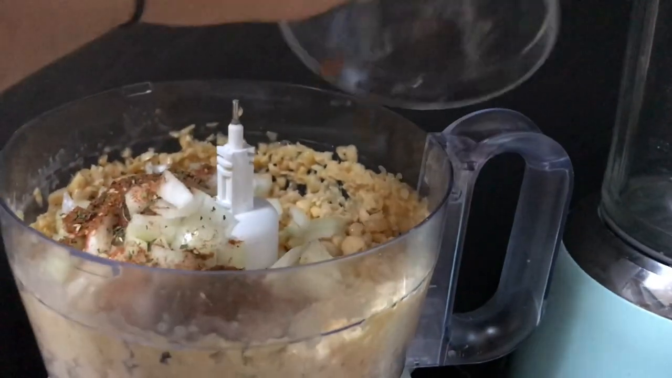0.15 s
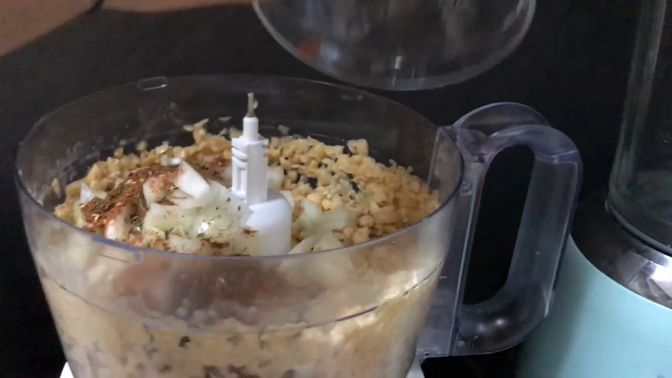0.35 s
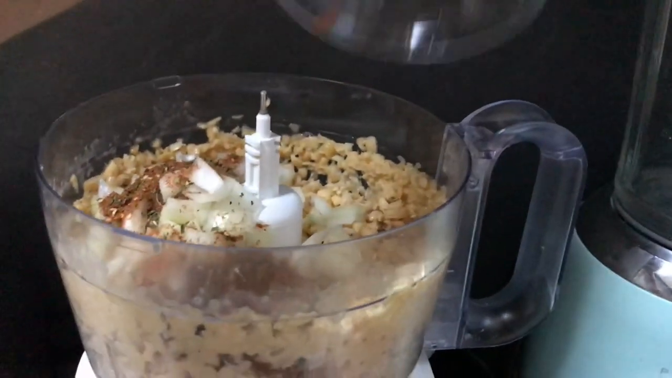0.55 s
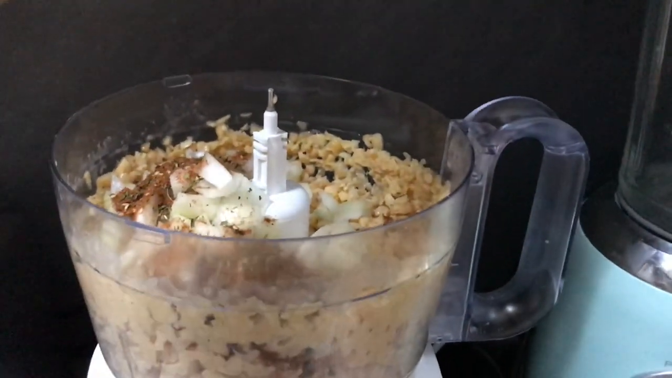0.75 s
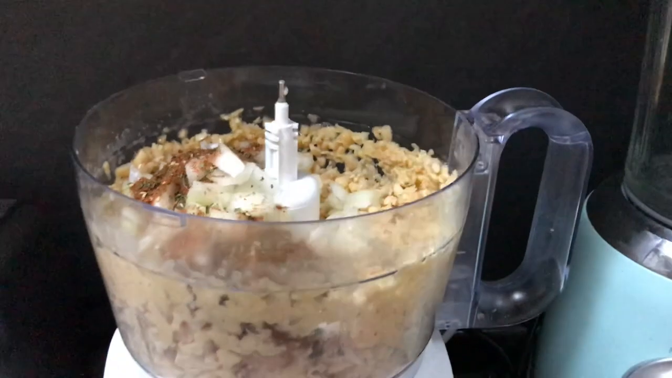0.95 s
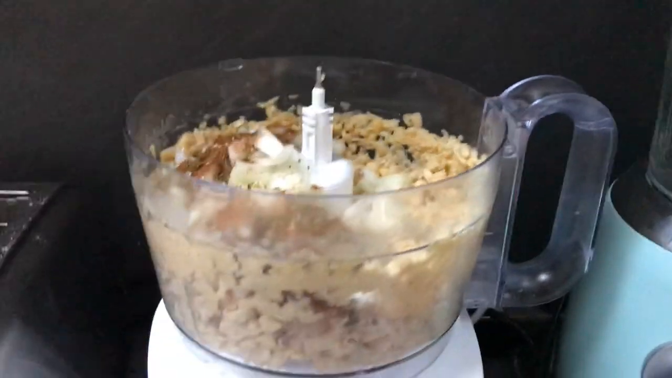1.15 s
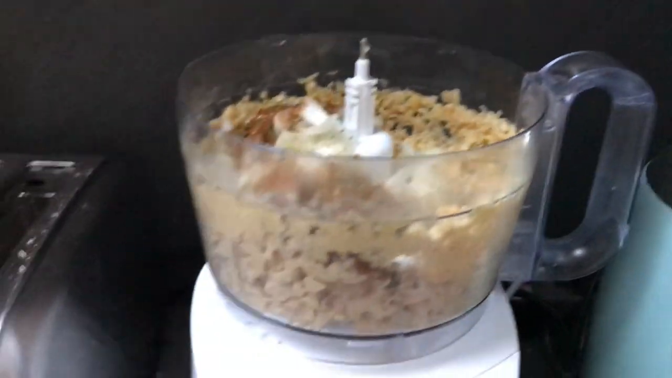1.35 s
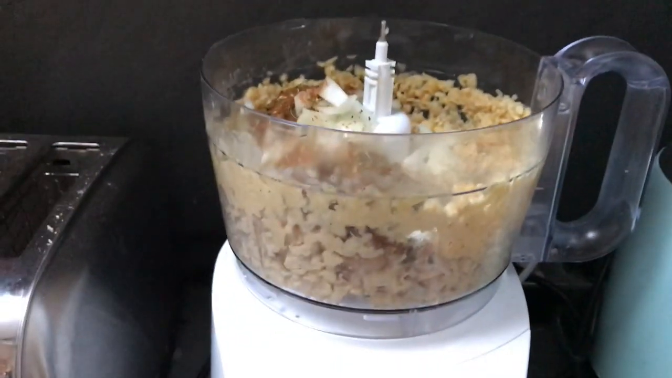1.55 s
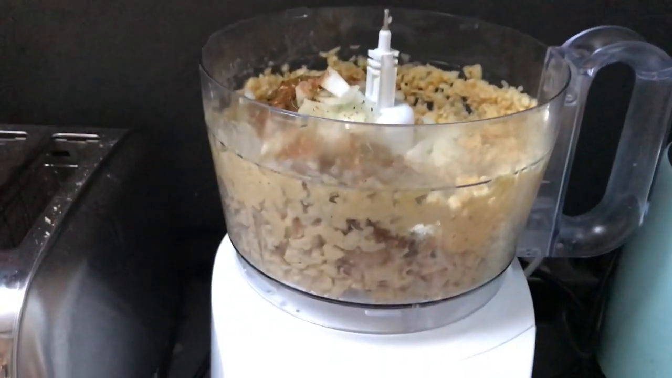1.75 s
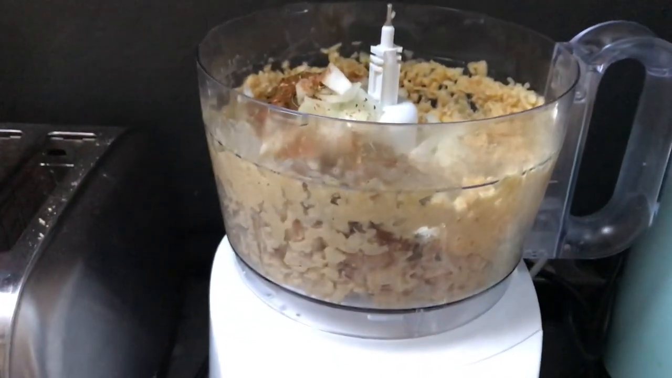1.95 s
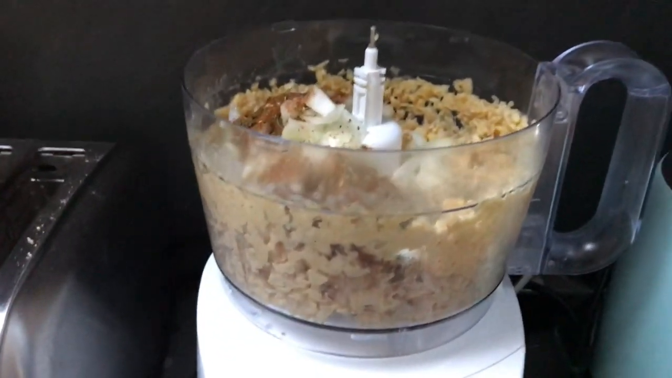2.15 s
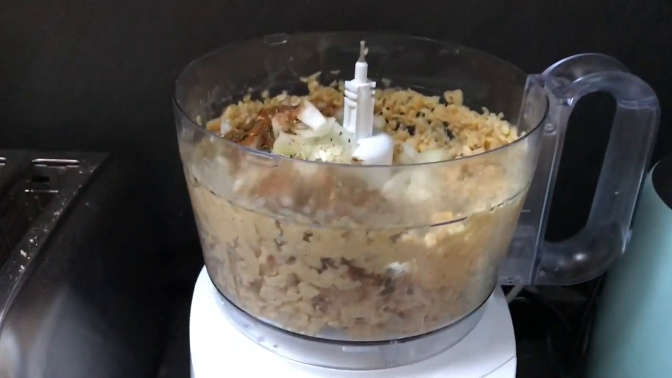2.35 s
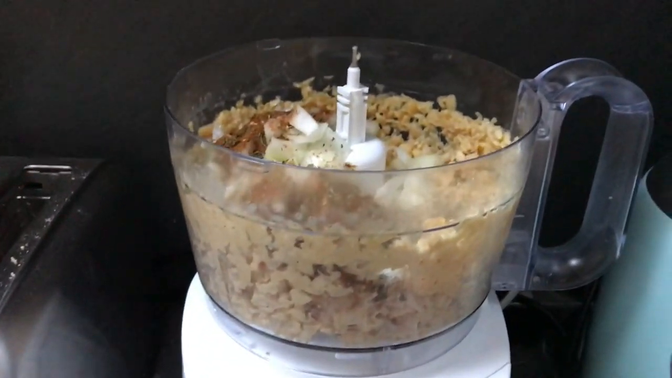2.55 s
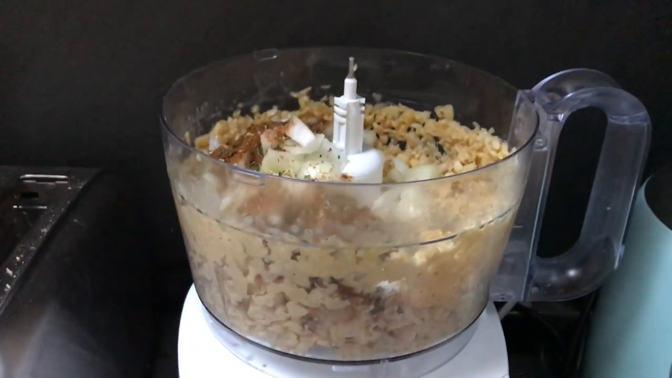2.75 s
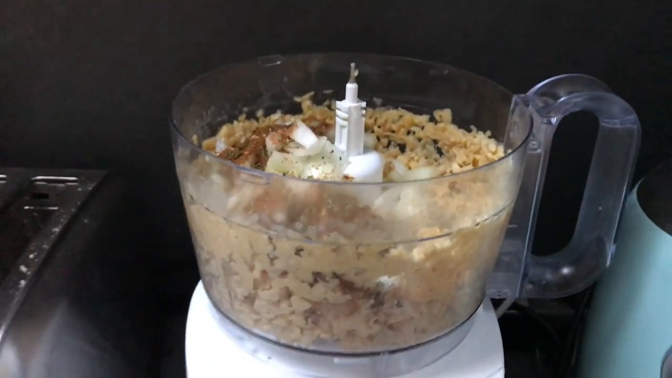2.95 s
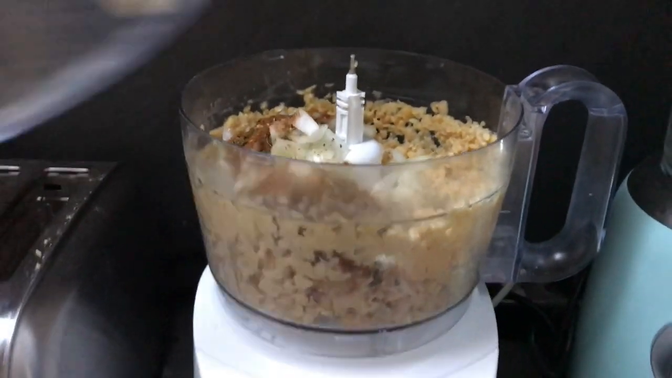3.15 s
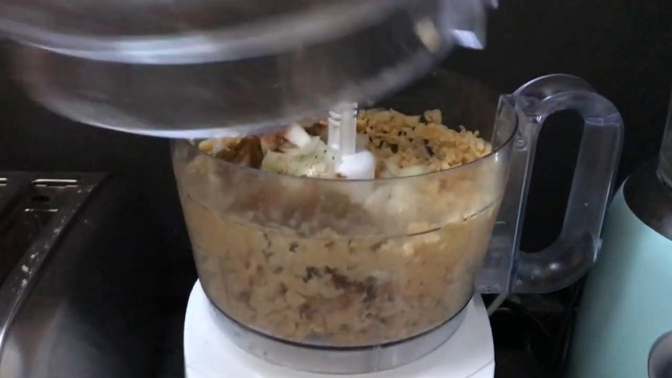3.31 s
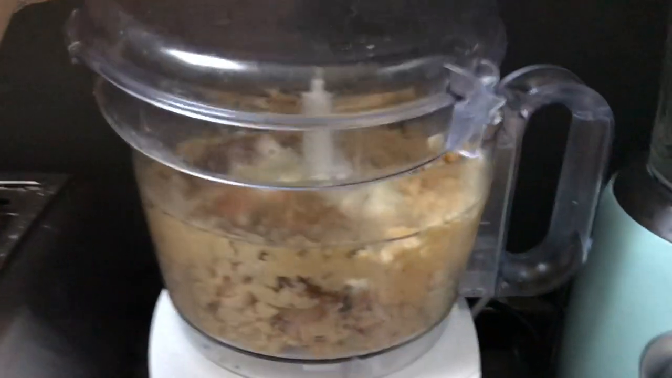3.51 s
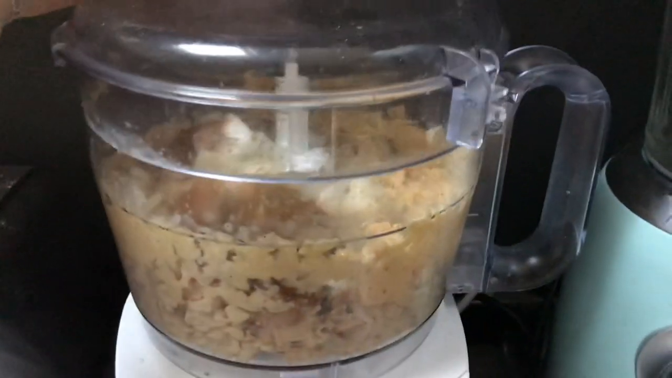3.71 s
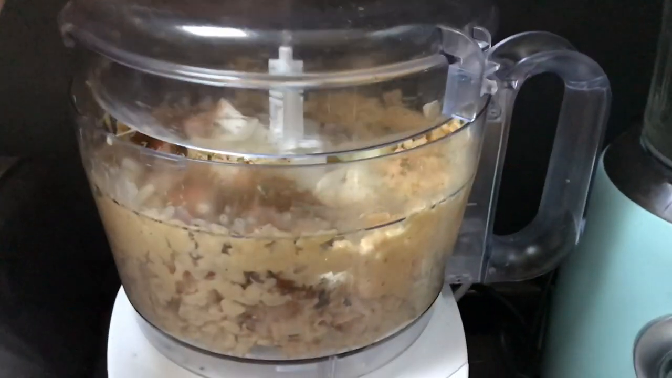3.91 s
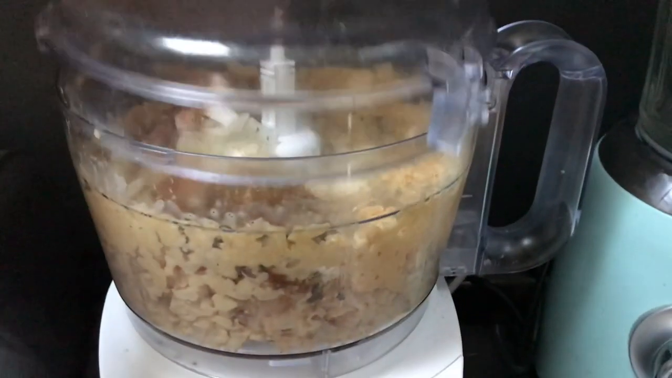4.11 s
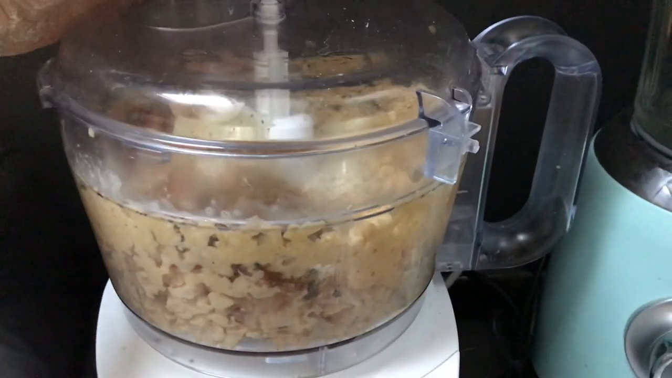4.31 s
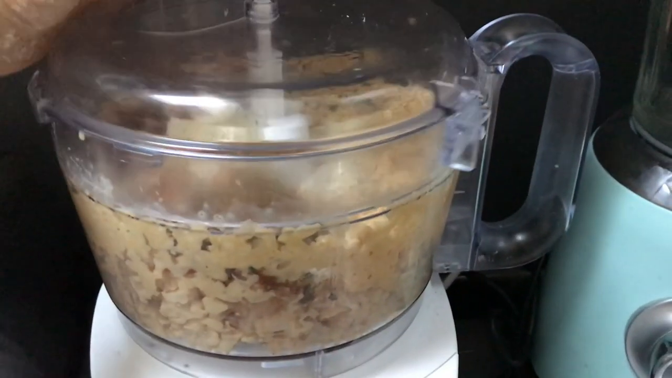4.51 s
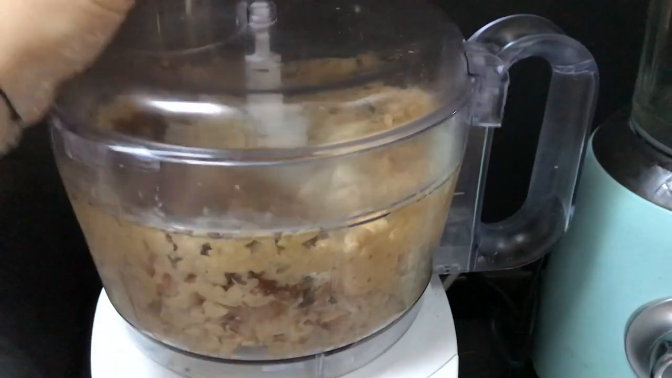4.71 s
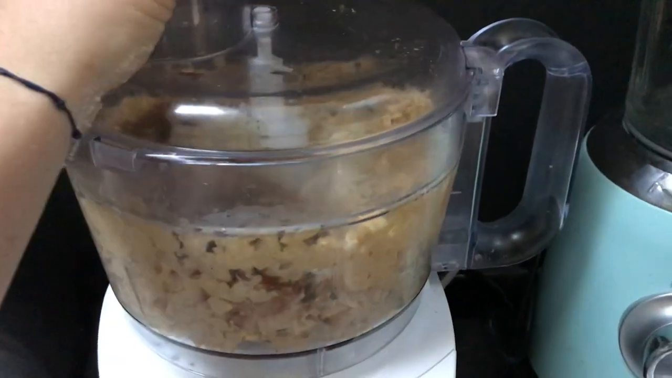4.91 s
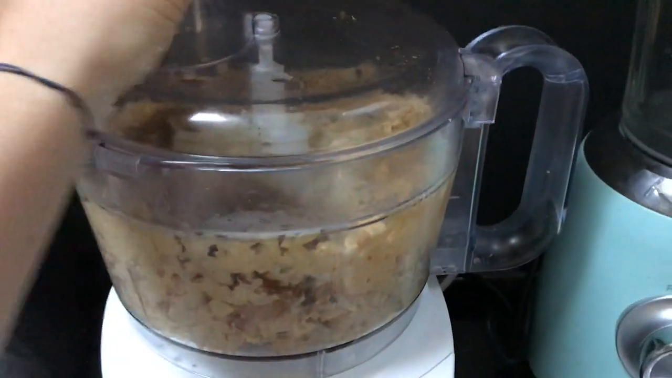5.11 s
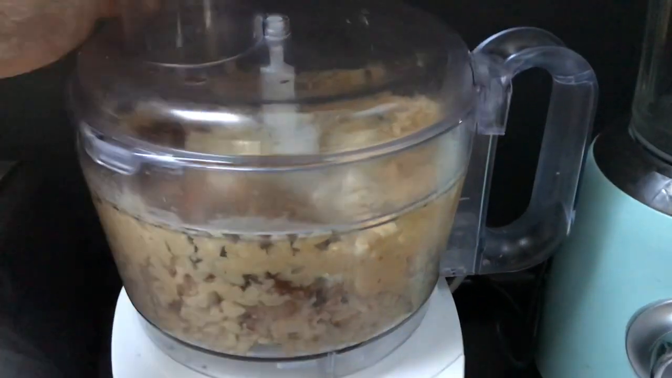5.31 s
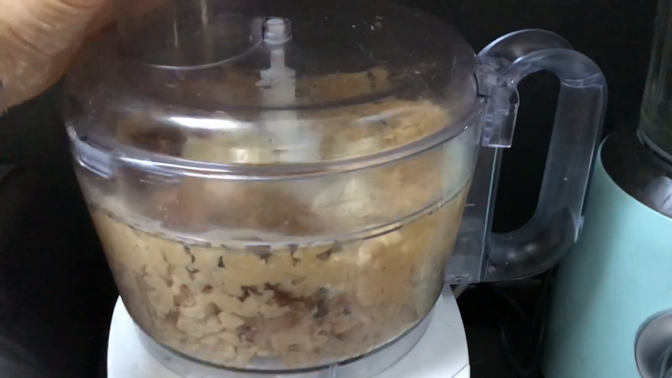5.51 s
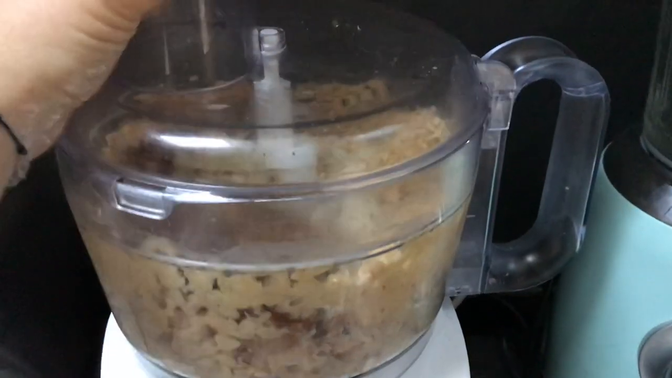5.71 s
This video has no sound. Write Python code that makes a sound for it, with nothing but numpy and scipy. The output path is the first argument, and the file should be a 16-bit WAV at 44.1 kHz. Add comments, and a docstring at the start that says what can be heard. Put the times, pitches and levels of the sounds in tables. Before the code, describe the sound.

In a quiet kitchen, glass knocks down with a faint lingering ring, followed by hard plastic clattering, short rubbing, a tiny squeak and locking clicks.

```python
"""A fridge whines faintly in the airy background of a small kitchen, as steady tones over soft noise.
A little glass bowl is set down on the worktop: it knocks and rocks to rest, and its rim note hums on.
A low hum, a tone with its octave, then sets in and rises and falls.
A plastic food processor lid clatters onto the work bowl, is slid round with a squeak and snaps into its lock.
Knocks are dying noise plus ringing tones, rubbing is shaped noise, and the squeak is a falling tone."""
import sys
import numpy as np
from scipy import signal
from scipy.io import wavfile

SR = 44100
rng = np.random.default_rng(int(sys.argv[2]) if len(sys.argv) > 2 else 0)


def dump(signal):
    """Clip the signal to [-1, 1] and save it as 16-bit WAV at the path in sys.argv[1]."""
    limited = np.clip(np.atleast_2d(signal).T, -1, 1)
    pcm = np.round(limited * 32767).astype(np.int16)
    wavfile.write(sys.argv[1], SR, pcm)


N = 258514
TIME = np.arange(N) / SR
RING_TIME = TIME[:SR // 2]

# Pitch ranges in which the strength of a blow is set, from thump and knock up to clack and tick:
# (low edge [Hz], high edge [Hz], length of the attack [s])
ZONES = [(55, 400, .03), (400, 2100, .012), (2100, 6000, .012), (6000, 16000, .012)]


def glass_bowl():
    """The foot of the bowl knocks on the worktop and chatters to rest, while the rim note rings on."""
    # blows of the glass: (time [s], knock [dB], thump above the knock [dB],
    # treble slope [dB per octave], each bounce above the contact before it [dB])
    glass_hits = [(.808, -79, 10, -1, -1.5), (1.68, -18, -10.5, -7, -25.5), (1.763, -21, -11.5, -6.5, -23),
                  (1.791, -24.5, -10, -7, -14.5), (1.806, -28, -7.5, -6.5, -2.5),
                  (1.922, -17, -13, -5.5, -8), (1.968, -26, -3, -3, -19), (1.98, -26, -8, -18, -3),
                  (2.255, -62, 6, -8, -12), (2.5, -43.5, 7.5, -8.5, -10.5)]
    # crowded, quickly dying vibrations of the worktop: (pitch [Hz], level [dB per Hz], time to fall 60 dB [s])
    worktop = [(70, 0.5, 0.08), (164, -2.5, 0.15), (261, -7, 0.16), (400, 7.5, 0.019), (625, 8, 0.042),
               (810, -0.5, 0.047), (1190, 10, 0.032), (1780, -1.5, 0.016), (2270, -27.5, 0.026),
               (3404, 5, .035), (4110, -19, 0.046), (6400, -28, 0.007), (15000, -31, 0.0075)]
    # separate ringing tones: (pitch [Hz], level [dB], time to fall 60 dB [s])
    glass_modes = [(72, -5, .25), (124, -13, .35), (180, -8, .22), (385, -14, .15), (692, -5, .12),
                   (1025, -12, .14), (1120, -3, .13), (1160, 5, .02), (1930, -18, .1), (3300, -8, .035),
                   (3680, -8, .035), (8800, -9, .014), (9450, -30, .13), (9490, -28, .15),
                   (12980, -25, .11), (13020, -31, .11), (15350, -28, .1)]
    touches = contacts(glass_hits, gap_s=.0095, presence_db=-3, dulling_db=1.4, count=4)
    knocks = blows(touches, worktop, glass_modes, rise_s=0.0001, crack_db=6.5, crack_s=0.01)
    return knocks + rim_note()


def rim_note():
    """The bowl is not quite round, so two close rim tones beat slowly as they die away."""
    struck_s, level_db, t60_s = 1.922, -42, 2.27
    rim_hz, beat_hz, twin_db = 1196, 2.15, -7.5
    age = np.maximum(TIME - struck_s, 0)
    main_tone = np.sin(2 * np.pi * rim_hz * age)
    twin_tone = from_db(twin_db) * np.sin(2 * np.pi * (rim_hz + beat_hz) * age)
    fade = np.exp(-np.log(1000) * age / t60_s)
    return from_db(level_db) * fade * (main_tone + twin_tone)


def lid_knocks():
    """The lid clatters and rebounds once per blow; once it is seated, the hand shifts its tones each time."""
    # blows of the lid: (time [s], knock [dB], thump above the knock [dB],
    # treble slope [dB per octave], the bounce above the contact before it [dB])
    lid_hits = [(3.631, -20, -15.5, -5.5, -21), (3.691, -25.5, -15, -3.5, -12),
                (3.708, -28.5, -13, -11, -8), (3.798, -16, -19.5, -9, -7.5), (3.857, -35, -12, -5, -28),
                (3.867, -30.5, -8.5, -8.5, 1), (3.935, -50.5, 7.5, -1.5, -2.5),
                (4.062, -44.5, 0, -5.5, -23), (4.14, -63.5, 0, -1.5, 9), (4.169, -28.5, -7.5, -6.5, -6),
                (4.183, -40, 1.5, -3, -16), (4.216, -50, 3.5, 1, -4), (4.2499, -13.5, -10.5, -6.5, -7),
                (4.268, -33.5, 0, -3.5, -9), (4.281, -29, -0.5, -2, -14), (4.3291, -23.5, -7, -6.5, -8.5),
                (4.803, -28.5, -14, -1.1, 2.5), (4.871, -37, 2, -8, -13.5), (5.185, -45.5, 1, -4.5, -23.5),
                (5.244, -42.5, 2, -6.5, -1), (5.388, -36, -5.5, 0, -19), (5.397, -21, -7, -5.5, -0.5),
                (5.507, -34, -7.5, -10.5, -20), (5.547, -40, 1.5, -8, -10), (5.658, -31, -9, -1.5, 4.5),
                (5.711, -32, -0.5, -3.5, -6), (5.736, -28.5, 3, -1.5, -8), (5.7425, -19.5, -12.5, -2.5, 4),
                (5.769, -35.5, -21, -2, -7)]
    # crowded, quickly dying vibrations of the plastic: (pitch [Hz], level [dB per Hz], time to fall 60 dB [s])
    plastic = [(70, -11.5, .2), (153.3, -12.5, 0.098), (271, -0.5, 0.082), (432, -9, 0.028),
               (593, -3.5, 0.06), (805, 3.5, 0.032), (1240, -5, 0.044), (1460, -13, 0.038),
               (2060, -13.5, 0.036), (3070, -6.5, 0.042), (6500, -22, 0.034), (15700, -29, 0.01475)]
    # ringing tones; the seated lid is damped by the rim and drives the low tones of the work bowl:
    # (pitch [Hz], level when loose [dB], level when seated [dB], time to fall 60 dB [s])
    lid_modes = [(118.7, -9, -6.5, 0.25), (169, -18, -1, 0.14), (214.7, -37, 3.5, 0.093),
                 (281.9, -9.5, -0.5, 0.11), (565, -15, -20, .2), (770, -10, -15, .05), (862, -4, -11, .09),
                 (876, -2, -8, .13), (1020, -15, -7, .07), (1140, -8, -13, .15), (1465, -11, -4, .05),
                 (1530, 2, 2, .06), (1645, -3, -3, .07), (2114, -21.5, -11, 0.063),
                 (2460, -14, -8.5, 0.061), (2646, -18.5, -4, .04), (2870, -18, -13, 0.07),
                 (3360, -6.5, -20, 0.056), (4095, -25.5, -3, 0.019)]
    seated_from_s = 4.24
    grip_detune = 0.0266  # typical shift as a share of the pitch
    touches = contacts(lid_hits, gap_s=.0052, presence_db=2.0, dulling_db=0.3, count=1)
    seated = touches[:, :1] > seated_from_s
    modes = []
    for hz, loose_db, seated_db, t60 in lid_modes:
        shifted_hz = hz * (1 + seated * grip_detune * rng.standard_normal(seated.shape))
        modes.append((shifted_hz, np.where(seated, seated_db, loose_db), t60))
    return blows(touches, plastic, modes, rise_s=0.00052, crack_db=0.5, crack_s=0.0096)


def contacts(hits, gap_s, presence_db, dulling_db, count):
    """List each blow and its bounces, each bounce duller per octave: (time [s], level in each zone [dB])."""
    centres = np.sqrt([low * high for low, high, _ in ZONES])
    # how far the two upper zones lie above the knock zone
    clack_octaves, tick_octaves = np.log2(centres[2:] / centres[1])
    rows = []
    for s, knock_db, thump_db, slope_db, bounce_db in hits:
        for k in range(count + 1):
            db = knock_db + k * bounce_db
            slope = slope_db - k * dulling_db
            clack_db = db + presence_db + slope * clack_octaves
            tick_db = db + slope * tick_octaves
            rows.append((s + k * gap_s, db + thump_db, db, clack_db, tick_db))
    return np.array(rows)


def blows(hits, body, modes, rise_s, crack_db, crack_s, scatter_db=2.0):
    """Every contact rings the same body; where and how hard it lands sets the share of each zone."""
    rings = unit_attack(dense_ring(body, len(hits)), .012)
    for hz, level_db, t60 in modes:
        # the point of contact decides how strongly, and which way, a tone is pushed
        scattered_db = level_db + scatter_db * rng.standard_normal((len(hits), 1))
        direction = np.sign(rng.standard_normal((len(hits), 1)))
        tone = dying(t60) * np.sin(2 * np.pi * hz * RING_TIME)
        rings = rings + from_db(scattered_db) * direction * tone
    # the contact takes a moment to build up, and opens with a short crack
    rings = rings * (1 - np.exp(-RING_TIME / rise_s))
    rings = rings * from_db(crack_db * np.exp(-RING_TIME / crack_s))
    voiced = 0
    for k, (low, high, span_s) in enumerate(ZONES):
        zone_sound = unit_attack(band(rings, low, high, order=3), span_s)
        voiced = voiced + zone_sound * from_db(hits[:, [k + 1]])
    out = np.zeros(N + len(RING_TIME))
    for s, sound in zip(hits[:, 0], voiced):
        start = round(s * SR)
        out[start:start + len(sound)] += sound
    return out[:N]


def lid_slide():
    """Glass and plastic rub and slide under the fingers: noise made grainy by tiny catches of the rim."""
    # rubs: (time [s], length [s], grind at the end of the stroke [dB], hiss at the end of the stroke [dB])
    strokes = [(0.916, 0.042, -84, -73), (1.143, .12, -71, -71.5), (2.003, 0.29, -70, -66),
               (2.462, 0.061, -45, -57), (2.579, .025, -68, -62.5), (2.657, 0.044, -56.5, -58),
               (2.857, 0.07, -68, -67.5), (3.637, 0.15, -45, -62), (3.814, 0.043, -32, -44.5),
               (3.92, 0.018, -45, -61.5), (3.986, .05, -46, -59.5), (4.182, .13, -38.5, -50),
               (4.407, 0.19, -58.5, -61.5), (4.606, 0.24, -48.5, -55), (4.816, 0.04, -48.5, -54.5),
               (4.925, 0.253, -65.5, -68), (5.197, 0.059, -48.5, -55), (5.369, 0.033, -44, -49),
               (5.445, 0.044, -48.5, -59), (5.565, 0.095, -55.5, -60), (5.644, 0.082, -41, -44.5),
               (5.719, 0.024, -34, -42), (5.788, 0.033, -45.5, -68)]
    # colour of the low grinding noise: (pitch [Hz], level [dB per Hz])
    grind_colour = [(60, -34), (110, -6.5), (160, 1), (280, -6), (460, -10), (870, -7), (1250, -14),
                    (1520, -12.5), (2300, -23), (3200, -24), (6000, -62)]
    # colour of the high hissing noise: (pitch [Hz], level [dB per Hz])
    hiss_colour = [(1200, -37), (2200, 0.5), (3200, 1.5), (4700, 1.5), (7000, -3.5), (10000, -4),
                   (14500, -11.5), (16500, -4.5)]
    rough_db, catches_per_s = 2.0, 330
    grind, hiss = 0, 0
    for s, length_s, grind_db, hiss_db in strokes:
        shape = stroke(s, length_s)
        grind = grind + from_db(grind_db) * shape
        hiss = hiss + from_db(hiss_db) * shape
    catches = rms_one(from_db(rough_db * drift(catches_per_s)))
    return catches * (grind * coloured(grind_colour) + hiss * coloured(hiss_colour))


def stroke(start, length_s):
    """Loudness of a rub: it takes hold, swells as the hand presses on, and dies when the hand stops."""
    attack_s, rise_db, release_db_per_s = 0.017, 9, 252
    age = TIME - start
    swell_db = rise_db * (np.clip(age / length_s, 0, 1) - 1)
    release_db = release_db_per_s * np.maximum(age - length_s, 0)
    return np.clip(age / attack_s, 0, 1) * from_db(swell_db - release_db)


def lid_squeak():
    """The rim sticks and slips, giving brief falling tones with their octave."""
    # squeaks: (time [s], settled pitch [Hz], level [dB])
    squeaks = [(5.286, 5725, -26.5), (5.37, 5650, -41)]
    attack_s, t60_s, octave_db = 0.0043, 0.034, -9
    sharp_hz, settle_s = 600, 0.0035  # each starts this much higher and falls
    out = 0
    for s, hz, db in squeaks:
        age = np.maximum(TIME - s, 0)
        pitch = hz + sharp_hz * np.exp(-age / settle_s)
        phase = 2 * np.pi * np.cumsum(pitch) / SR
        fade = np.interp(age - attack_s, RING_TIME, dying(t60_s))
        envelope = np.minimum(age / attack_s, 1) ** 2 * fade
        tone = np.sin(phase) + from_db(octave_db) * np.sin(2 * phase)
        out = out + from_db(db) * envelope * tone
    return out


def background():
    """Add up the room air, the fridge and the low hum."""
    return room_air() + fridge_whine() + low_hum()


def fridge_whine():
    """The fridge gives faint tones of steady level whose phase wanders a little."""
    # tones: (pitch [Hz], rms level [dB], speed of the wandering [random steps per s])
    fridge_tones = [(98, -69, 2.7), (159, -72, 54), (685, -80, 15), (1427, -79.5, 15), (1530, -79, 10),
                    (1570, -81, 5.2), (1650, -75, 0.98), (1736, -81, 4.6)]
    stray = 0.41  # typical phase wander, radians
    out = 0
    for hz, db, steps_per_s in fridge_tones:
        tone = np.sin(2 * np.pi * hz * TIME + stray * drift(steps_per_s))
        out = out + from_db(db) * np.sqrt(2) * tone
    return out


def low_hum():
    """A low tone with its octave sets in, wavers in pitch, and rises and falls in level."""
    # loudness of the hum: (time [s], level [dB])
    hum_level = [(2.35, -72), (2.6, -53), (2.95, -51.5), (3.25, -60.5), (3.7, -46.5), (5.5, -47),
                 (5.86, -54)]
    hum_hz, waver_hz, octave_db = 79.5, 0.36, -14
    phase = 2 * np.pi * np.cumsum(hum_hz + waver_hz * drift(1.8)) / SR
    swell = (TIME > hum_level[0][0]) * from_db(in_time(hum_level)[0])
    return swell * (np.sin(phase) + from_db(octave_db) * np.sin(2 * phase))


def room_air():
    """The air of the room is steady, mostly low noise."""
    # colour of the air noise: (pitch [Hz], level [dB per Hz])
    air_colour = [(25, -28), (50, -1.5), (90, 4), (150, -4.5), (220, -11), (500, -13), (1000, -16.5),
                  (1550, -19), (2100, -23), (4000, -28), (9000, -33), (16000, -35.5)]
    return from_db(-64.5) * coloured(air_colour)


def kitchen(x, wet_db):
    """Add echoes off nearby surfaces, which colour the treble, and the blurred tail of a small hard room."""
    # echoes off worktop, wall and neighbouring appliances: (delay [s], level [dB])
    reflections = [(.0011, -17), (.0029, -22.5), (.0052, -21)]
    # dying away of the room: (pitch [Hz], level [dB], time to fall 60 dB [s])
    room_decay = [(60, -7, 0.28), (259.6, -7, 0.39), (1000, -3.5, 0.4), (3000, 1, 0.32), (8200, 4, 0.19),
                  (16100, -0.5, 0.083)]
    tail_onset_s = 0.0085
    treble = band(x, 2400, 16000, order=1)  # small surfaces reflect only short waves
    echoes = 0
    for delay, db in reflections:
        echoes = echoes + from_db(db) * np.pad(treble, (round(delay * SR), 0))[:N]
    # the tail is silent up to its onset, then fades in over the same time again
    fade_in = np.clip(RING_TIME / tail_onset_s - 1, 0, 1)
    tail = dense_ring(room_decay, count=1)[0] * fade_in
    reverb = signal.fftconvolve(x, tail / np.linalg.norm(tail))[:N]
    return x + echoes + from_db(wet_db) * reverb


def dense_ring(body, count):
    """Countless overlapping vibrations sound like noise that dies band by band."""
    out = 0
    for hz, noise in noise_bands(count, len(RING_TIME)):
        level_db, t60 = at_hz(body, hz)
        out = out + from_db(level_db) * dying(t60) * noise
    return out


def coloured(spectrum):
    """Make steady noise with this spectrum, rms 1."""
    out = 0
    for hz, noise in noise_bands(N):
        out = out + from_db(at_hz(spectrum, hz)[0]) * noise
    return rms_one(out)


def noise_bands(*shape):
    """Yield (centre [Hz], noise) in bands of about 0.4 octave; neighbours are unrelated."""
    white = rng.standard_normal((2, *shape))
    edges = np.geomspace(25, 17500, 25)
    for k, (low, high) in enumerate(zip(edges, edges[1:])):
        yield np.sqrt(low * high), band(white[k % 2], low, high)


def drift(rate):
    """Smooth random wandering with this many random steps per second, rms 1."""
    knots = rng.standard_normal(N // 8)
    return rms_one(np.interp(TIME * rate, np.arange(len(knots)), knots))


def dying(t60):
    """Envelope that loses 60 dB in t60 seconds."""
    return np.exp(-np.log(1000) * RING_TIME / t60)


def unit_attack(rings, span_s):
    """Scale each ring to rms 1 over its opening span."""
    opening = rings[:, :round(span_s * SR)]
    return rings / np.sqrt(np.mean(opening ** 2, axis=1, keepdims=True) + 1e-20)


def band(x, low, high, order=2):
    """Keep only the pitches between low and high (Hz)."""
    return signal.sosfilt(signal.butter(order, [low, high], "band", fs=SR, output="sos"), x)


def from_db(db):
    """Turn decibels into a gain."""
    return 10 ** (np.asarray(db) / 20)


def rms_one(x):
    """Scale to rms 1."""
    return x / np.sqrt(np.mean(x ** 2) + 1e-20)


def in_time(rows):
    """Read each column of a curve at every sample."""
    s, *columns = np.transpose(rows)
    return [np.interp(TIME, s, c) for c in columns]


def at_hz(rows, hz):
    """Read the columns of a spectrum at one pitch."""
    f, *columns = np.transpose(rows)
    return [np.interp(np.log(hz), np.log(f), c) for c in columns]


def scene():
    """Bowl and lid sound in the kitchen, over the background, in one channel."""
    bowl = kitchen(glass_bowl(), wet_db=-14.5)
    lid = kitchen(lid_knocks() + lid_slide() + lid_squeak(), wet_db=-20)
    return (bowl + lid + background())[None]


def record(dry):
    """Cut the top steeply above 16300 Hz."""
    return signal.sosfilt(signal.ellip(10, .1, 80, 16300, fs=SR, output="sos"), dry)


dry = scene()
out = record(dry)
dump(out)
```